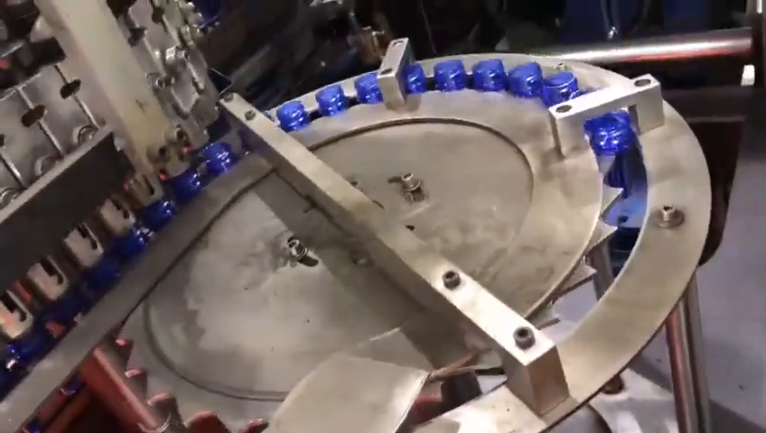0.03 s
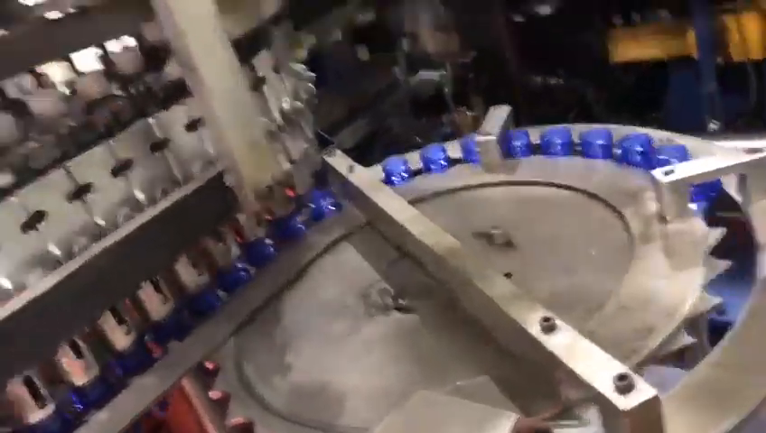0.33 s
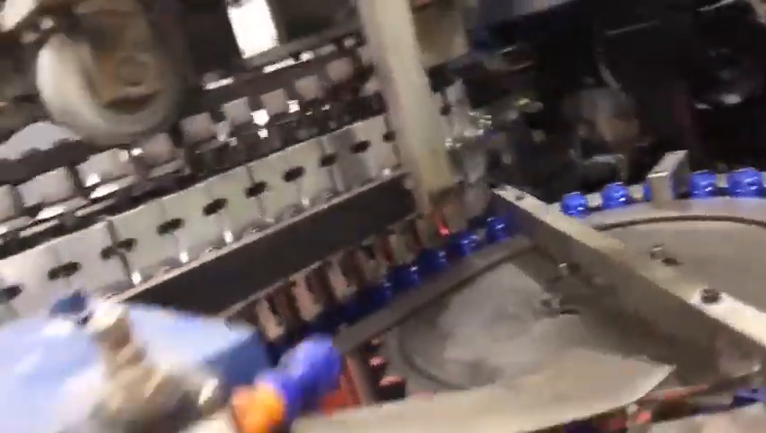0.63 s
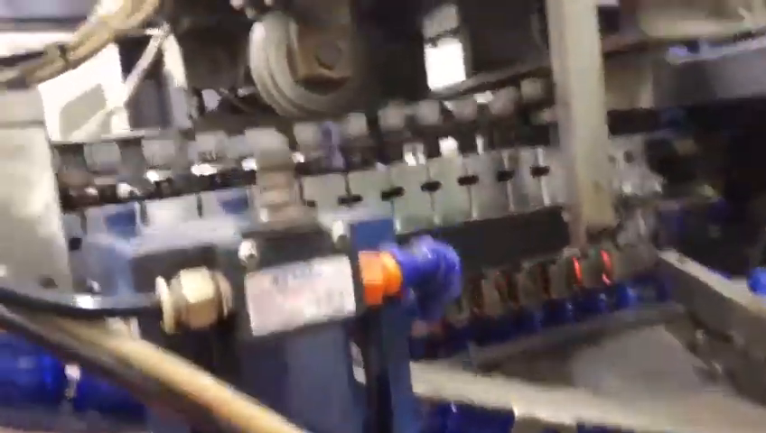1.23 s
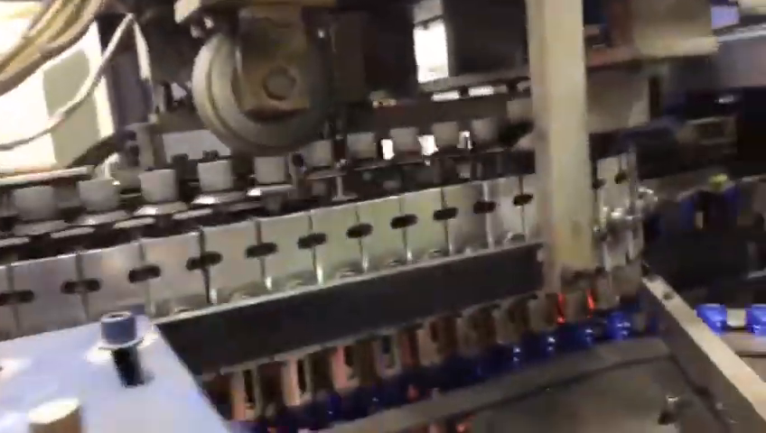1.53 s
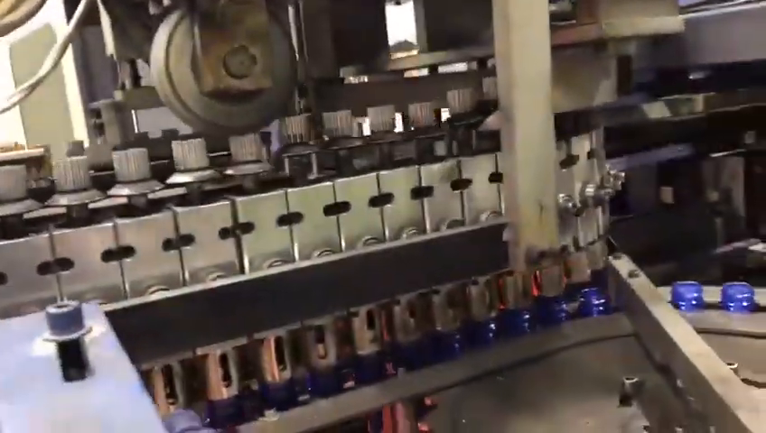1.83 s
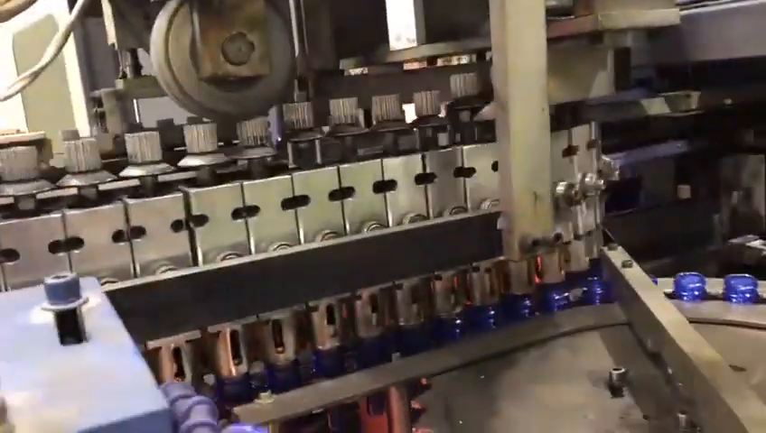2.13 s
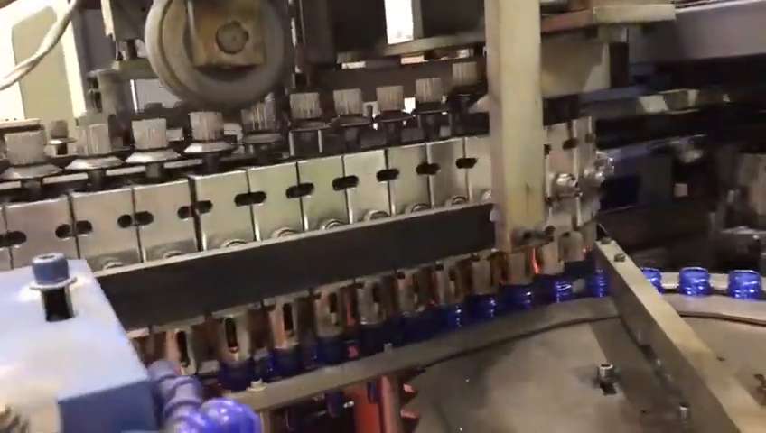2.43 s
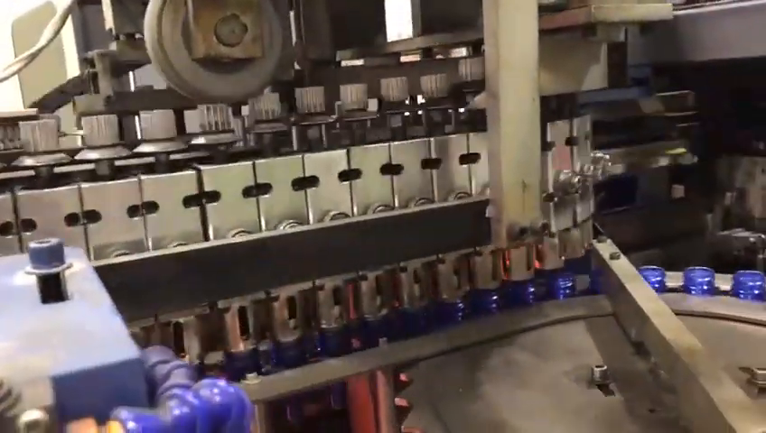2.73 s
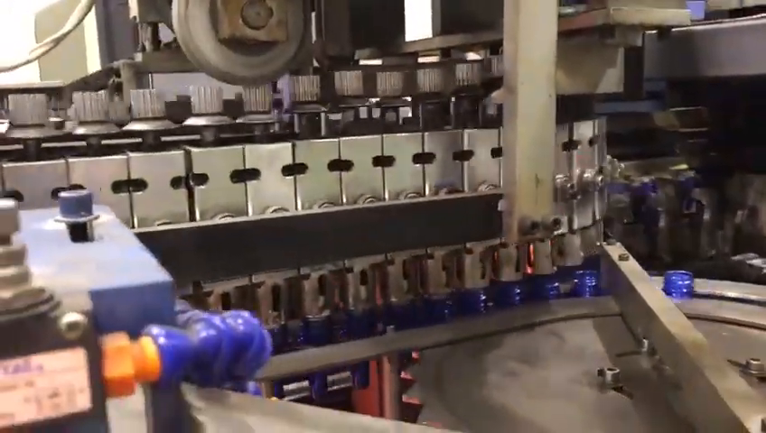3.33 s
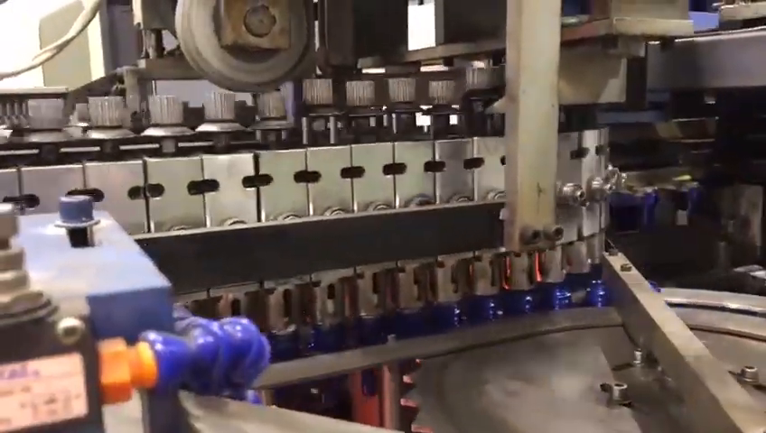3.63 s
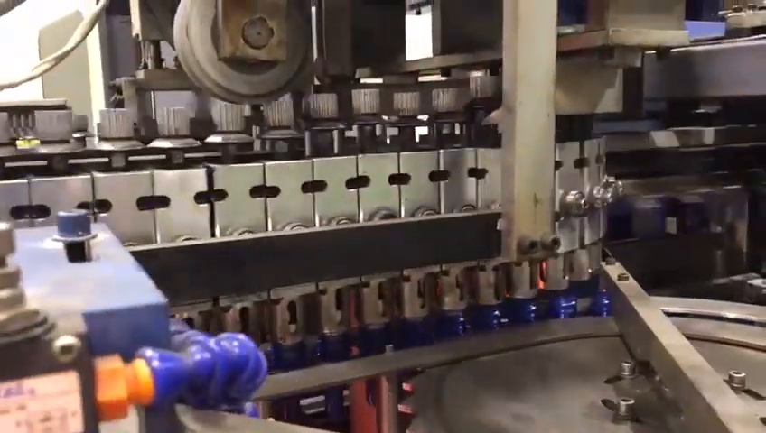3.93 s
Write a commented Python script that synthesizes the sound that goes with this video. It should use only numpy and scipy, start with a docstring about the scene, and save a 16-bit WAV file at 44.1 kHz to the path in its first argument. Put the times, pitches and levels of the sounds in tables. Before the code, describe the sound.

Compressed air hisses loudly from a factory machine as its mould clacks shut and thumps open, then a valve puffs briefly. The cycle repeats once, directly in front of the microphone, over a low rumble and occasional knocks.

```python
"""A steady drive and conveyor rumble in a factory hall, with soft knocks on a machine housing.
Over it a bottle blow-moulding machine runs two cycles: a valve vents, the mould slides shut and
clacks, blowing air is dumped, the mould thumps open, a valve knocks out two short puffs.
Jets are turbulent noise; struck steel rings in decaying modes.
Gain control ducks the rumble under each blast and lets it swell back slowly."""
import sys
import numpy as np
from scipy import signal
from scipy.fft import rfft, irfft
from scipy.io import wavfile
from scipy.ndimage import uniform_filter1d

SR = 44100
rng = np.random.default_rng(int(sys.argv[2]) if len(sys.argv) > 2 else 0)


def generate_wav(signal):
    """Clip the signal to [-1, 1] and save it as 16-bit WAV at the path in sys.argv[1]."""
    frames = np.transpose(np.atleast_2d(signal))
    scaled = np.clip(frames, -1, 1) * 32767
    pcm = np.round(scaled).astype(np.int16)
    wavfile.write(sys.argv[1], SR, pcm)


N = 176400
T = np.arange(N) / SR

# machine cycles: start_s; each offset_s below counts from these
CYCLE_STARTS_S = [-2.195, 0.094, 2.383]
# drive and conveyor spectrum: freq_hz, level_db
RUMBLE_SPECTRUM = [(25, -40), (62, -37), (100, -16), (135, -7.5), (190, -2.5), (250, -0.5), (305, -4.8),
                   (370, -5.3), (500, -9.3), (600, -12), (730, -9.5), (900, -15), (1700, -14.5),
                   (2700, -16), (4000, -21), (7000, -26.5), (11000, -30.5), (15500, -33.5)]
# motor tones: pitch_hz, wander_hz, level_db
MOTOR_TONES = [(88.5, 1.3, -44.5), (252.9, 10.08, -32), (532, 5.22, -41.5), (2960, 20, -54)]
# chain motor advancing the preforms: offset_s, attack_s, hold_s, t60_s, level_db
GROAN = (1.84, .16, .52, .1, -38)
# conveyor blows on the housing: start_s, level_db
KNOCKS = [(.006, -21), (.045, -14), (.205, -11), (1.745, -16), (1.875, -19), (2.095, -13.5), (2.116, -23),
          (2.478, -15)]
# housing modes: pitch_hz, level_db, t60_s
HOUSING_MODES = [(200, -6, 0.13), (240, -2, 0.14), (281, -11, 0.19), (372, -5, 0.09), (537, -5.5, 0.054)]
# air spits as preforms advance: start_s, attack_s, hold_s, t60_s, level_db, tilt_db_per_octave
SPITS = [(.045, .004, .01, .15, -26, -1.5), (1.714, .002, .005, .09, -18.5, -.1),
         (1.907, .002, .006, .13, -23, 2.2), (2.335, .035, .03, .1, -26, .5)]
# valve jets: offset_s, attack_s, hold_s, t60_s, level_db, tilt_db_per_octave
VENTS = [(-.002, .025, .16, .25, -12.1, 0.2), (.735, .010, .014, .08, -13.5, -.6),
         (.758, .035, .03, .29, -12.3, 0), (1.408, .02, .12, 9.0, -33.7, 2.3)]
# vent and spit spectrum: freq_hz, level_db
VENT_SPECTRUM = [(100, -27), (400, -7), (800, 1), (2500, 0.5), (4000, 0), (7000, 0.5), (11000, 0),
                 (15500, -0.5)]
# blowing-air dump: offset_s, attack_s, hold_s, t60_s, level_db
DUMP = (0.12, .045, .356, .35, -4.9)
# dump spectrum: freq_hz, level_db
DUMP_SPECTRUM = [(100, -23), (600, -8.5), (1250, -6.5), (1800, 1), (2200, -.5), (2600, 1.8), (3500, -2.8),
                 (4800, 0.5), (6500, 0.5), (8800, 1.2), (11000, 0), (15500, -0.5)]
# dump whistles: pitch_hz, width_hz, relative_db
WHISTLES = [(2902, 25, -31), (4713, 15, -28), (5310, 35, -29), (8764, 15, -25)]
# mould shutting, mould opening, chain advancing: offset_s, attack_s, hold_s, t60_s, level_db
SLIDES = [(.061, .006, .067, .2, -10), (.48, .04, .04, .9, -19.5), (1.55, .06, .05, .35, -25.5)]
# slide spectrum: freq_hz, level_db
SLIDE_SPECTRUM = [(30, -42), (70, -21), (140, -6.5), (280, -4), (450, -4), (800, -12), (1500, -14.5),
                  (4000, -16.5), (15000, -26)]
# mould locking: start_s, attack_s, hold_s, t60_s, level_db
CLACKS = [(.2375, .001, .006, .065, -1), (2.530, .001, .004, .035, 0.5)]
# steel impact spectrum: freq_hz, level_db
CLACK_SPECTRUM = [(60, -21), (300, -7), (800, -3), (1400, 2), (2000, -2.5), (3200, -2.5), (4500, -12.5),
                  (15000, -32)]
# lock modes: pitch_hz, level_db, t60_s
LOCK_MODES = [(1380, -12, .07), (1863, -12, .05), (2735, -15, .08), (2898, -12.5, .5)]
# steel squeals on locking: start_s, pitch_hz, length_s, level_db
SQUEALS = [(.247, 5330, .016, -4.5), (2.533, 2920, .009, -5), (2.542, 5400, .019, -8.5)]
# mould carriage thumps: start_s, attack_s, hold_s, t60_s, level_db
THUMPS = [(0.585, 0.032, 0.025, 0.2, -17), (2.543, .008, 0.012, 0.14, -11),
          (2.904, 0.013, 0.021, 0.13, -17)]
# thump spectrum: freq_hz, level_db
THUMP_SPECTRUM = [(25, -22), (50, -7), (85, 0), (135, -1.5), (220, 0), (380, .5), (550, -9), (1000, -18),
                  (4000, -40)]
# valve spool hit and bounce: offset_s, level_db
VALVE_HITS = [(.740, -14), (.749, -13.5)]
# valve body modes: pitch_hz, level_db, t60_s
VALVE_MODES = [(760, -9, .08), (1153, -4, 0.088), (1544, -10.5, 0.045), (2620, -6, .07), (3630, -8, .04),
               (4520, -16, .06)]

CUTOFF_HZ, STEEL_CONTACT_S = 15750, .0005


def from_db(db):
    """Decibels to gain."""
    return 10 ** (np.asarray(db) / 20)


def unit_rms(x):
    """Scale to unit power."""
    return x / np.sqrt(np.mean(x ** 2) + 1e-20)


def drift(rate_hz):
    """Smooth random motion, unit RMS."""
    hop, warmup = 40, 2000
    pole = np.exp(-2 * np.pi * rate_hz * hop / SR)
    white = rng.standard_normal(N // hop + warmup + 2)
    slow = signal.lfilter([1], [1, -2 * pole, pole * pole], white)[warmup:]
    return np.interp(np.arange(N) / hop, np.arange(len(slow)), unit_rms(slow))


def noise(spectrum, tilt_db_per_octave=0):
    """Shaped noise, unit RMS."""
    hz = np.maximum(np.arange(N // 2 + 1) * SR / N, 1)
    points_hz, points_db = np.transpose(spectrum)
    shape_db = np.interp(np.log(hz), np.log(points_hz), points_db)
    gain = from_db(shape_db + tilt_db_per_octave * np.log2(hz)) * (hz < CUTOFF_HZ)
    return unit_rms(irfft(rfft(rng.standard_normal(N)) * gain, N))


def tone(pitch_hz, wander_hz, rate_hz=12):
    """Sine with wandering pitch, unit RMS."""
    return np.sqrt(2) * np.sin(2 * np.pi * np.cumsum(pitch_hz + wander_hz * drift(rate_hz)) / SR)


def envelope(start_s, attack_s, hold_s, t60_s, level_db):
    """Linear rise, hold, exponential fade."""
    fade_db = 60 * np.maximum(T - start_s - attack_s - hold_s, 0) / t60_s
    return np.clip((T - start_s) / attack_s, 0, 1) * from_db(level_db - fade_db)


def each_cycle(offset_s, *shape):
    """One envelope per machine cycle."""
    return sum(envelope(start_s + offset_s, *shape) for start_s in CYCLE_STARTS_S)


def flicker(x, depth_db, rate_hz, count=10):
    """Near-octave bands swell and sink independently."""
    log_hz = np.log(np.maximum(np.arange(N // 2 + 1) * SR / N, 1))
    centres, spectrum = np.log(np.geomspace(70, CUTOFF_HZ, count)), rfft(x)
    bands = (irfft(spectrum * np.interp(log_hz, centres, share), N) for share in np.eye(count))
    return sum(band * from_db(depth_db * drift(rate_hz)) for band in bands)


def struck(blows, modes, attack_s):
    """Each blow rings all modes, strengths slightly scattered."""
    out = np.zeros(N)
    for start_s, blow_db in blows:
        for pitch_hz, mode_db, t60_s in modes:
            ring = envelope(start_s, attack_s, 0, t60_s, blow_db + mode_db + rng.normal(0, 1.0))
            out += ring * np.sin(2 * np.pi * pitch_hz * (T - start_s))
    return out


def drive(rumble_db=-19.5, split_hz=900, rattle_depth_db=.8):
    """Lumpy rumble below, fast chain rattle above, motor hum and groan."""
    bed = from_db(rumble_db) * noise(RUMBLE_SPECTRUM)
    rumble = signal.sosfiltfilt(signal.butter(2, split_hz, fs=SR, output="sos"), bed)
    rattle = (bed - rumble) * from_db(rattle_depth_db * drift(rate_hz=63))
    hum = sum(from_db(db) * tone(hz, wander_hz) for hz, wander_hz, db in MOTOR_TONES)
    groan = each_cycle(*GROAN) * tone(pitch_hz=86, wander_hz=9)
    return flicker(rumble + hum + groan, depth_db=1.17, rate_hz=10) + rattle


def conveyor_knocks():
    """Soft blows ring the housing's low modes."""
    return struck(KNOCKS, HOUSING_MODES, attack_s=.0043)


def frame_echoes(jet, max_delay_s=.011, gain=.12, count=8):
    """Short reflections comb-filter a jet."""
    lags = (rng.uniform(.04, 1, count) * max_delay_s * SR).astype(int)
    return unit_rms(jet + gain * sum((-1) ** k * np.roll(jet, lag) for k, lag in enumerate(lags)))


def air_jets():
    """Turbulent valve jets; the big dump whistles faintly."""
    vents = sum(each_cycle(*shape) * frame_echoes(noise(VENT_SPECTRUM, tilt)) for *shape, tilt in VENTS)
    spits = sum(envelope(*shape) * noise(VENT_SPECTRUM, tilt) for *shape, tilt in SPITS)
    whistles = sum(from_db(db) * drift(width_hz) * tone(hz, width_hz / 2)
                   for hz, width_hz, db in WHISTLES)
    dump = each_cycle(*DUMP) * (frame_echoes(noise(DUMP_SPECTRUM)) + whistles)
    return flicker(vents + spits + dump, depth_db=.9, rate_hz=28)


def mould(rasp_db=3.5):
    """Slides rumble, the steel lock clacks, rings and squeals, the carriage thumps."""
    slides = sum(each_cycle(*row) for row in SLIDES) * noise(SLIDE_SPECTRUM)
    clacks = sum(envelope(*row) for row in CLACKS) * noise(CLACK_SPECTRUM)
    ring = struck([(start_s, db) for start_s, *_, db in CLACKS], LOCK_MODES, STEEL_CONTACT_S)
    squeals = np.zeros(N)
    for start_s, pitch_hz, length_s, level_db in SQUEALS:
        arch = np.sin(np.pi * np.clip((T - start_s) / length_s, 0, 1))
        squeal = tone(pitch_hz, wander_hz=130, rate_hz=120)
        squeals += arch * squeal * from_db(level_db + rasp_db * drift(rate_hz=160))
    thumps = sum(envelope(*row) for row in THUMPS) * noise(THUMP_SPECTRUM)
    return slides + clacks + ring + squeals + thumps


def valve_knocks(crack_t60_s=.055):
    """The spool hits its stop and bounces: a crack and a short body ring."""
    hits = [(cycle_s + offset_s, db) for cycle_s in CYCLE_STARTS_S[1:] for offset_s, db in VALVE_HITS]
    cracks = sum(envelope(start_s, STEEL_CONTACT_S, 0, crack_t60_s, db) for start_s, db in hits)
    return cracks * noise(CLACK_SPECTRUM) + struck(hits, VALVE_MODES, STEEL_CONTACT_S)


def hall(x, wet_db=-14):
    """Diffuse, evenly decaying reverberation."""
    decay = envelope(start_s=.032, attack_s=.012, hold_s=0, t60_s=.83, level_db=0)
    tail = rng.standard_normal(N) * decay
    return from_db(wet_db) * signal.fftconvolve(x, tail / np.linalg.norm(tail))[:N]


def scene():
    """Machine dead ahead, same in both ears."""
    cycles = air_jets() + mould() + valve_knocks()
    return np.tile(cycles + hall(cycles) + conveyor_knocks() + drive(), (2, 1))


def record(dry):
    """Gain control, fast attack and slow recovery; then a steep low-pass."""
    sense_highpass_hz, sense_s, threshold_db = 396, .035, -16.5
    attack_s, recovery_db_per_s = .0039, 10
    highpass = signal.butter(1, sense_highpass_hz, "high", fs=SR, output="sos")
    sensed = signal.sosfilt(highpass, dry.mean(axis=0))
    power = np.abs(uniform_filter1d(sensed ** 2, int(sense_s * SR)))
    excess_db = np.maximum(10 * np.log10(power + 1e-12) - threshold_db, 0)
    ramp_db = recovery_db_per_s * T
    cut_db = np.maximum.accumulate(excess_db + ramp_db) - ramp_db  # peak hold, linear release
    pole = np.exp(-1 / (attack_s * SR))
    ducked = dry * from_db(-signal.lfilter([1 - pole], [1, -pole], cut_db))
    return signal.sosfilt(signal.ellip(12, .1, 80, CUTOFF_HZ, fs=SR, output="sos"), ducked)


dry = scene()
out = record(dry)
generate_wav(out)
```